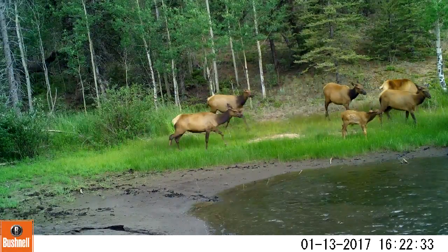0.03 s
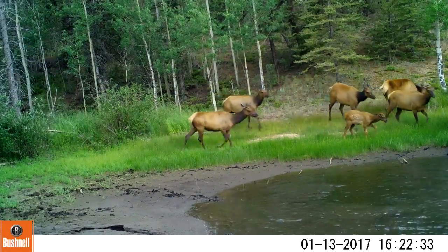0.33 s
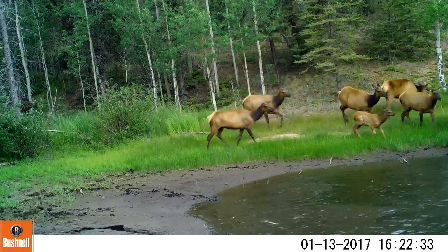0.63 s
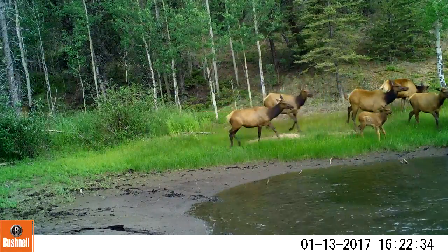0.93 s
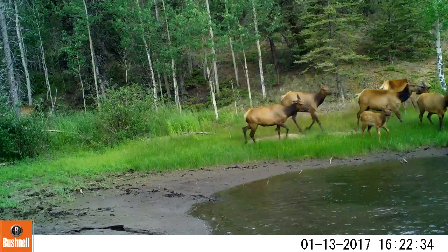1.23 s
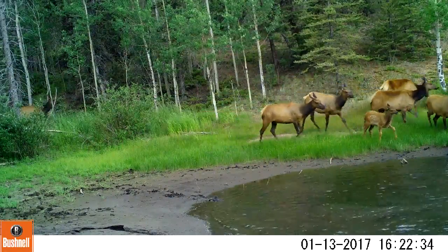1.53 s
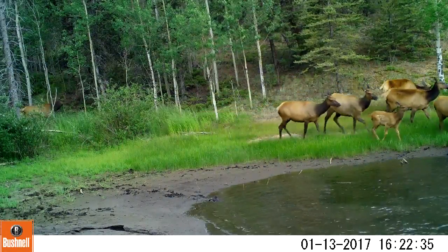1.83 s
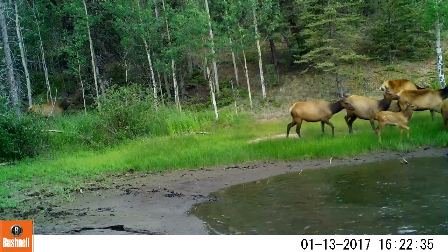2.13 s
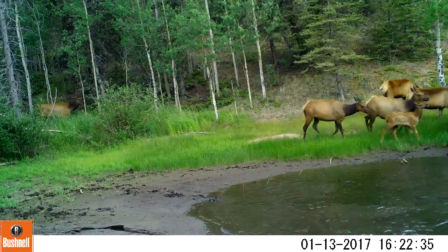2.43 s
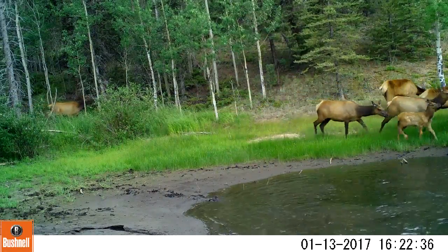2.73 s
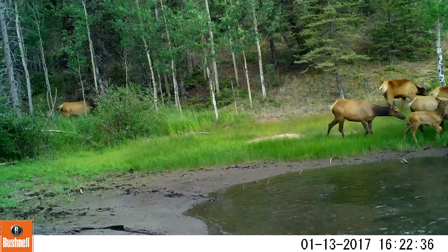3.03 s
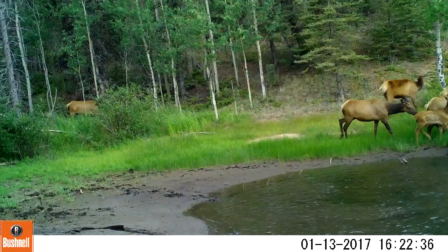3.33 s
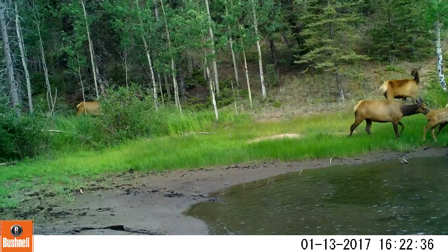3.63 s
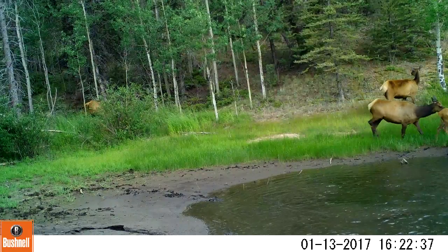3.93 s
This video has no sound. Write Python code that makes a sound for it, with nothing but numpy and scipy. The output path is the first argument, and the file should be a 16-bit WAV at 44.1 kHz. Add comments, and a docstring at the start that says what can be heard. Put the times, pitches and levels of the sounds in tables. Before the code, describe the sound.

Elk mew faintly across a forest pond from about 1.3 to 3.6 seconds, in short, overlapping calls that rise and fall with a light echo. A soft snort comes at 0.5 seconds and a louder one at 2.8. Small splashes are scattered throughout, clustering near 2.1, with a sharp drip at 1.3. Wind rumbles and thumps on the microphone over steady hiss, easing after 3.5 seconds.

```python
"""A forest pond, with elk across the water from the microphone of a trail camera.
Cows and calves mew, each short call arching in pitch through the resonances of the throat. Two snorts
blow through the nostrils, the water gives a few small splashes and a drip, and the trees echo it all.
Gusts buffet the microphone and overload its input; steady hiss and distant forest air lie underneath."""
import sys
import numpy as np
from scipy import signal
from scipy.fft import rfft, irfft, next_fast_len
from scipy.io import wavfile
from scipy.ndimage import uniform_filter1d, map_coordinates

SR = 44100
rng = np.random.default_rng(int(sys.argv[2]) if len(sys.argv) > 2 else 0)


def to_wav(sig):
    """Store sig (one row per channel, or 1-D mono) as 16-bit WAV at the path in sys.argv[1].

    Samples outside -1..1 are clipped; the rate is SR.
    """
    pcm = np.clip(np.atleast_2d(sig), -1, 1) * 32767
    pcm = np.round(pcm).astype(np.int16)
    wavfile.write(sys.argv[1], SR, pcm.T)  # frames by channels


N = 176400

# Calls across the pond: t/s at the top, top f/Hz, rise/s, fall/s, level/dB, roughness/0-1, overtones/dB
MEWS = [(1.338, 943, .11, 0.18, -41, 0.38, -6), (1.619, 754, .105, 0.11, -37, 0.33, 1),
        (1.775, 960, .14, .14, -46, 0.3, -11), (1.957, 757, 0.098, .10, -34.5, 0.37, -2.5),
        (1.999, 805, .12, 0.091, -33.5, 0.23, 4.5), (2.171, 947, .12, .13, -45, 0.65, -1),
        (2.303, 764, .10, .098, -33.5, 0.41, 2), (2.404, 785, .115, 0.11, -34.5, 0.14, 2.5),
        (2.56, 731, 0.12, 0.16, -47.5, 0.55, -11), (2.655, 762, .11, 0.1, -37.5, 0.39, -3),
        (2.886, 783, .112, 0.1, -29.5, 0.14, -1.5), (3.001, 751, .11, .11, -40, .45, -4),
        (3.41, 780, 0.11, .11, -39.5, 0.55, -6), (3.472, 770.6, .117, 0.11, -31.5, 0.18, 1)]
# Resonances of throat and mouth: f/Hz, gain/dB
THROAT = [(400, -32), (780, -15), (1130, -13), (1310, 2.5), (1560, 1.5), (1900, -3.5), (2350, -17),
          (3000, -24), (3800, -16.5), (4600, -18.5), (5400, -20), (6400, -11), (7100, -22), (8200, -27),
          (12000, -51)]
# Where a call's overtone level applies: f/Hz, share/0-1
OVERTONE_SHARE = [(1900, 0), (2900, 1)]
# Blows through the nose: t/s, attack/s, hold/s, release/s, level/dB, nasal resonance f/Hz
SNORTS = [(0.483, 0.1, 0.015, 0.16, -32, 3260), (2.766, 0.034, 0.062, 0.068, -24, 3720)]
# Air rushing through the nostrils: f/Hz, level/dB
NOSTRIL_SPECTRUM = [(400, -9), (1200, -13), (2300, -9), (3500, -7), (4600, -4.5), (5400, -12), (6400, 4.5),
                    (7000, -3), (8000, -11.5), (9000, -15), (10000, -11.5), (10800, -18.5), (11500, -24.5),
                    (13800, -25)]
# Small splashes on the pond: t/s, level/dB
SPLASHES = [(.145, -35.5), (.955, -36), (1.205, -36), (1.893, -40), (2.072, -31.5), (2.124, -32.5),
            (2.153, -36), (2.25, -33.5), (3.558, -38)]
# Their spray: f/Hz, level/dB
SPRAY_SPECTRUM = [(1000, -15), (3200, 5.5), (4600, -4), (5900, 12), (7200, -4), (9000, -3.5), (13500, -28)]
# One sharp drip: t/s, level/dB
DRIPS = [(1.281, -26)]
# Its bright tick: f/Hz, level/dB
DRIP_SPECTRUM = [(2000, -29.5), (3200, -15), (4800, -8), (5900, 9), (7000, -14), (8600, 10), (10500, -19),
                 (13500, -22)]
# Gust strength at the microphone: t/s, relative level/dB
GUSTS = [(0.0, -9), (0.2, -16), (0.23, -10.5), (0.32, -26), (0.36, -8.5), (0.5, -12.5), (0.56, -7.5),
         (0.91, -13), (1.08, -7), (1.16, -19), (1.26, -7.5), (1.41, -11), (1.46, -15.5), (1.5, -11),
         (1.9, -11), (1.93, -14.5), (2.23, -19), (2.27, -17), (2.38, -23.5), (2.42, -11), (2.66, -15.5),
         (2.7, -9), (2.75, -35), (2.78, -7.5), (2.99, -21), (3.01, -9.5), (3.06, -9), (3.1, -17),
         (3.19, -8.5), (3.52, -14), (3.58, -31.5), (3.61, -18), (3.7, -33.5), (3.79, -16.5), (3.84, -23.5),
         (4.0, -23)]
# Deep wind rumble: f/Hz, level/dB
RUMBLE_SPECTRUM = [(8, -23), (18, 3), (30, 2.5), (50, 0.5), (75, -8.5), (120, -16), (250, -42), (400, -51),
                   (900, -70), (3000, -110)]
# Buffeting in strong gusts: f/Hz, level/dB
BUFFET_SPECTRUM = [(30, -34), (65, 1.5), (100, -1), (160, -7.5), (250, -18.5), (400, -33), (900, -58.5),
                   (3000, -110)]
# Strength of the turbulence, the wind's upper band: t/s, relative level/dB
TURBULENCE_LEVELS = [(0.04, -21.5), (0.35, -44), (0.45, -19.5), (0.49, -43.5), (0.54, -13.5), (0.57, -31.5),
                     (0.78, -18.5), (0.84, -37), (1.05, -19), (1.2, -32), (1.22, -21), (1.25, -39),
                     (1.32, -15), (1.47, -37.5), (1.5, -23), (1.88, -31.5), (1.94, -25), (2.04, -43),
                     (2.38, -50), (2.41, -37.5), (2.94, -29.5), (2.96, -61), (3.02, -29), (3.47, -36),
                     (3.5, -42), (4.0, -46)]
# Colour of that turbulence: f/Hz, level/dB
TURBULENCE_SPECTRUM = [(60, -12.5), (150, 4), (250, 0), (400, -7.5), (700, -19.5), (1200, -33.5),
                       (2500, -46), (8000, -76)]
# Sharp slaps of wind on the microphone: t/s, level/dB
SLAPS = [(.529, -14.5), (.543, -11.5), (1.012, -19), (1.045, -25), (1.112, -20), (1.222, -16), (1.296, -15),
         (1.322, -10), (1.354, -15), (1.669, -16), (3.09, -22.5), (3.188, -19), (3.206, -18)]
# Their thud: f/Hz, level/dB
SLAP_SPECTRUM = [(40, -8), (200, 0), (450, -3), (900, -10.5), (1500, -25), (3000, -41), (8000, -80)]
# Decay of the echo among the trees: f/Hz, t60/s
FOREST_DECAY = [(300, 1), (1500, 1), (6000, 0.66), (12000, 0.6)]
# Steady hiss: f/Hz, level/dB
HISS_SPECTRUM = [(530, -17), (900, -1), (1030, 0), (1130, -1), (1460, -3), (1690, -4.5), (1900, -3.5),
                 (2060, -6), (2440, -7.5), (3700, -4.5), (4870, -7), (6050, 3.5), (7280, -5.5),
                 (10400, -17.5), (14000, -27.5)]
# Distant forest air: f/Hz, level/dB
AIR_SPECTRUM = [(40, 7.5), (200, -7), (400, 1.5), (800, -4), (1200, -53), (2500, -36.5)]


def mews(jitter=0.0565, rasp_depth=0.88, push_db_per_s=26, lag_s=0.0017):
    """Elk across the pond: each call's pitch arches, sweeping its harmonics through the throat."""
    out = np.zeros(N)
    for top_s, top_hz, rise, fall, db, rough, overtone_db in MEWS:
        span = slice(int(top_s * SR) - SR // 5, int(top_s * SR) + SR // 5)
        t = clock()[span] - top_s
        side_s = np.where(t < 0, rise, fall)
        shake = lambda rate: map_coordinates(rng.standard_normal(512), [(t - t[0]) * rate], mode="wrap")
        arch_hz = top_hz * np.exp(-(t / side_s) ** 2)
        pitch = arch_hz * (1 + jitter * rough * shake(190))
        phase = 2 * np.pi * np.cumsum(pitch) / SR
        plateau = np.exp(-np.abs((t - lag_s) / (0.55 * side_s)) ** 3.8)  # steep-edged, trails the pitch
        swell = np.sqrt(2) * amp(db + push_db_per_s * t) * plateau  # leans towards the falling end
        for k in range(1, 15):
            hoarse = rough + 0.037 * (k - 1)  # higher harmonics are rougher
            rasp = 1 - hoarse / 2 + rasp_depth * hoarse * (shake(300) + 1j * shake(300))
            gain = amp(along(THROAT, k * pitch) + overtone_db * along(OVERTONE_SHARE, k * pitch))
            out[span] += swell * gain * np.real(rasp * np.exp(1j * k * phase))
    return out


def snorts(nasal_db=8, nasal_width_hz=580, treble_hz=5060, flap_db=1.45):
    """An elk blows air through its nose and fluttering nostrils; the blow starts bright and dulls."""
    out = np.zeros(N)
    for start, attack, hold, release, db, nasal_hz in SNORTS:
        knots = start + np.cumsum([0, attack, hold, release])
        blow = amp(db) * np.interp(clock(), knots, [0, 1, 1, 0])
        nose = lambda hz: amp(nasal_db * np.exp(-((hz - nasal_hz) / nasal_width_hz) ** 2))
        air = unit(filtered(noise(NOSTRIL_SPECTRUM), nose))
        treble = filtered(air, lambda hz: hz > treble_hz)
        treble_db = np.interp(clock(), knots[[1, 3]], [2.75, -5.5])
        out += blow * (air + (amp(treble_db) - 1) * treble)
    return out * amp(flap_db * wobble(140))


def splashes(grain_db=3):
    """On the pond: brief grainy sprays of water and one sharp drip."""
    spray = unit(noise(SPRAY_SPECTRUM) * amp(grain_db * wobble(600)))
    drip = bursts(DRIPS, rise_s=0.0005, t60_s=0.019) * noise(DRIP_SPECTRUM)
    return bursts(SPLASHES, rise_s=0.0011, t60_s=0.14) * spray + drip


def wind(rumble_db=-2, strong_gust_db=-10, buffet_growth=1.51, chop_db=1.5, lump_db=4):
    """Gusts right on the microphone: rumble, buffeting that grows faster than it, turbulence, slaps."""
    gust_db = curve(GUSTS)
    rumble = amp(gust_db + rumble_db) * eddies(RUMBLE_SPECTRUM)
    buffet_db = -14.5 + buffet_growth * (gust_db - strong_gust_db) + chop_db * wobble(29.9)
    buffet = amp(buffet_db) * eddies(BUFFET_SPECTRUM)
    lumps = unit(noise(TURBULENCE_SPECTRUM) * amp(lump_db * wobble(70)))
    turbulence = amp(curve(TURBULENCE_LEVELS) + 2) * lumps
    slaps = bursts(SLAPS, rise_s=0.00082, t60_s=0.039) * noise(SLAP_SPECTRUM)
    return rumble + buffet + turbulence + slaps


def eddies(spectrum):
    """Low wind noise with its slow swells evened out."""
    x = noise(spectrum)
    power = np.abs(uniform_filter1d(x ** 2, size=4400))
    return x / np.sqrt(power + 1e-6)


def forest_echo(x, build_s=0.01):
    """The trees around the pond scatter back a diffuse tail whose treble dies first."""
    hz, t, bands = signal.stft(rng.standard_normal(SR), SR, nperseg=256)
    decay = amp(-60 * t / along(FOREST_DECAY, hz)[:, None])
    onset = 1 - np.exp(-t / build_s)
    tail = signal.istft(bands * decay * onset, SR, nperseg=256)[1]
    return signal.fftconvolve(x, tail / np.linalg.norm(tail))[:N]


def background(hiss_db=-40.5, air_db=-44):
    """Steady hiss and the air of the distant forest."""
    return amp(hiss_db) * noise(HISS_SPECTRUM) + amp(air_db) * noise(AIR_SPECTRUM)


def amp(db):
    """Decibels to gain."""
    return 10 ** (np.asarray(db) / 20)


def unit(x):
    """Scale to rms 1."""
    return x / np.sqrt(np.mean(x ** 2) + 1e-20)


def clock():
    """The time of each sample in seconds."""
    return np.arange(N) / SR


def along(points, hz):
    """Read (f/Hz, value) points on a log frequency axis."""
    freqs, values = np.transpose(points)
    return np.interp(np.log(hz + 1), np.log(freqs + 1), values)


def curve(rows):
    """Join (t/s, value) points by lines."""
    return np.interp(clock(), *np.transpose(rows))


def wobble(rate):
    """A smooth random curve, rate knots a second."""
    return map_coordinates(rng.standard_normal(4096), [clock() * rate], mode="wrap")


def filtered(x, response):
    """Pass x through a frequency response."""
    size = next_fast_len(N + SR // 2)
    return irfft(rfft(x, size) * response(np.fft.rfftfreq(size, 1 / SR)), size)[:N]


def noise(spectrum):
    """Coloured noise of rms 1."""
    return unit(filtered(rng.standard_normal(N), lambda hz: amp(along(spectrum, hz))))


def bursts(rows, rise_s, t60_s):
    """Envelope of quick bursts that die away, one for each (t/s, level/dB) row."""
    ages = [(np.maximum(clock() - start, 0), db) for start, db in rows]
    return sum((1 - np.exp(-age / rise_s)) * amp(db - 60 * age / t60_s) for age, db in ages)


def scene(echo_db=-10.5, near_send_db=-8):
    """At the microphone: far calls with their echo, nearer and drier snorts and splashes, wind, hiss."""
    calls = mews()
    near = snorts() + splashes()
    echo = amp(echo_db) * forest_echo(calls + amp(near_send_db) * near)
    return (calls + near + echo + wind() + background())[None]


def record(dry, ceiling=0.54, dc_block_hz=1, top_hz=14000):
    """The trail camera's mono input flattens the biggest gusts, blocks DC and cuts the highest treble."""
    clipped = dry[0] / (1 + np.abs(dry[0] / ceiling) ** 12) ** (1 / 12)
    passband = lambda hz: 1j * hz / (dc_block_hz + 1j * hz) * (hz < top_hz)
    return filtered(clipped, passband)[None]


dry = scene()
out = record(dry)
to_wav(out)
```